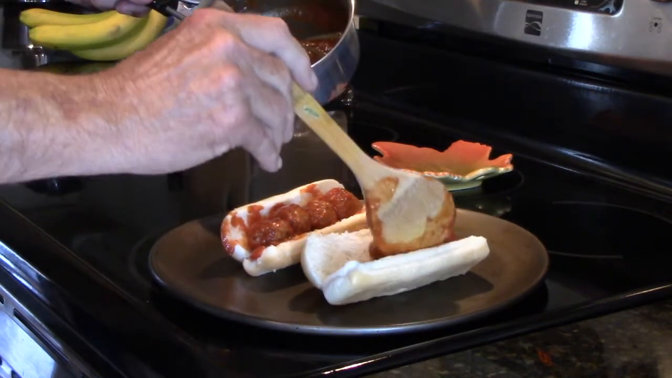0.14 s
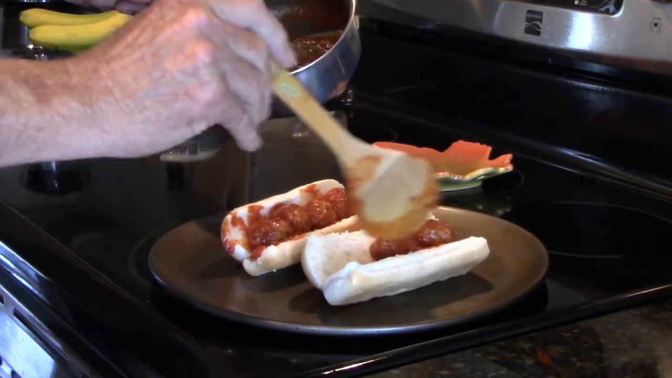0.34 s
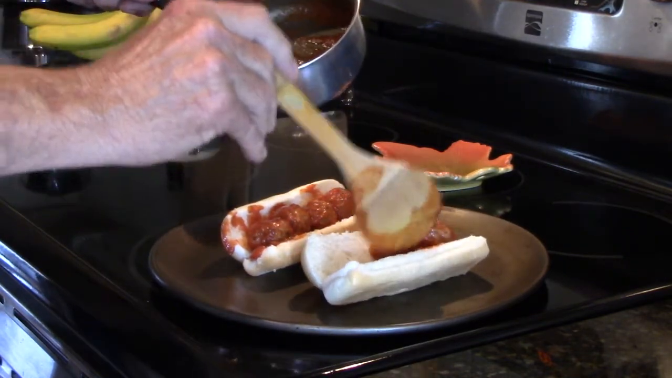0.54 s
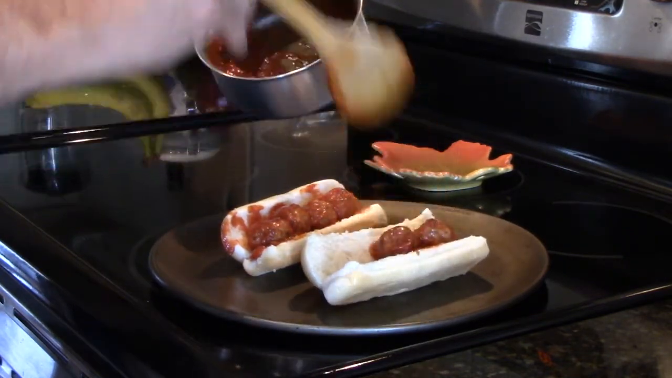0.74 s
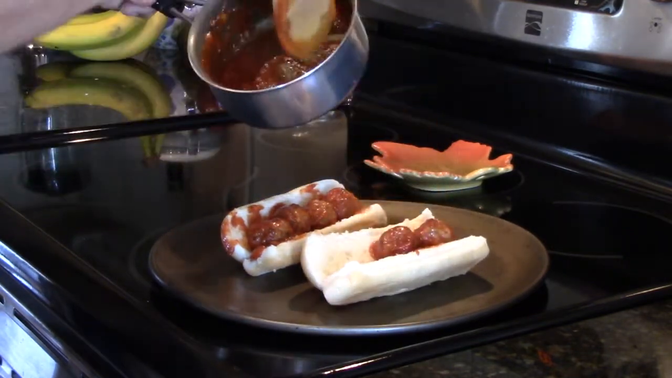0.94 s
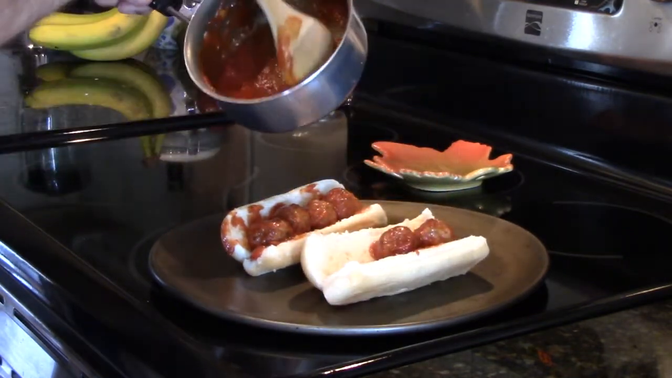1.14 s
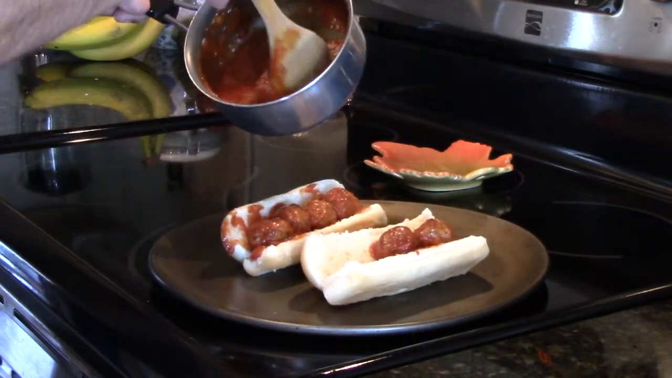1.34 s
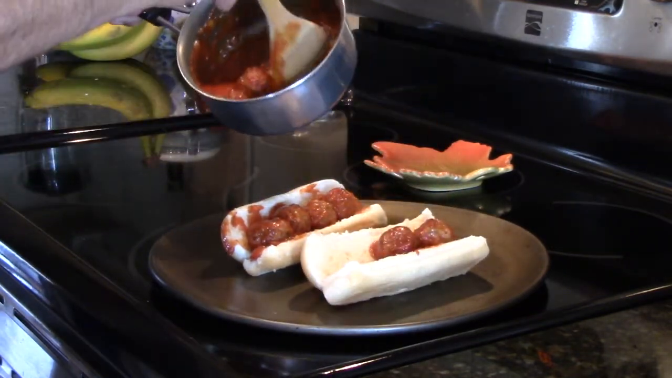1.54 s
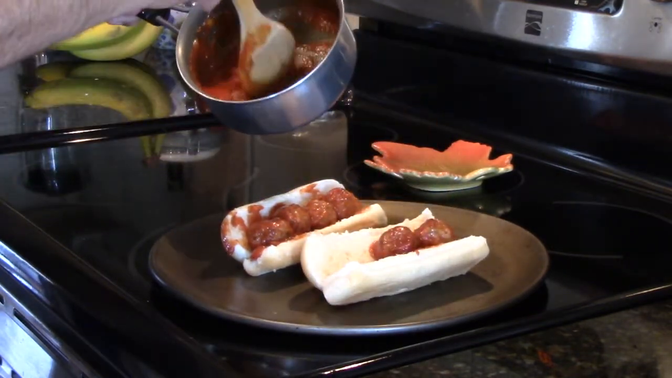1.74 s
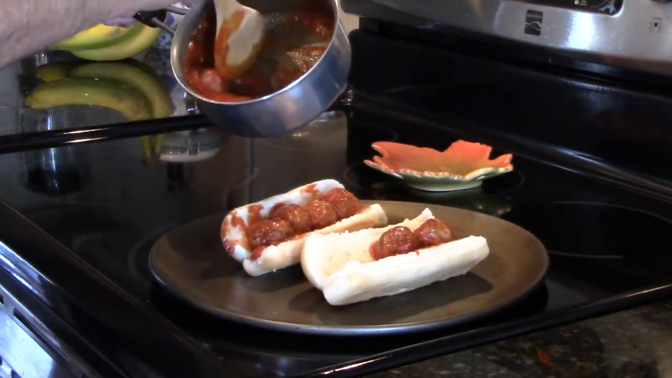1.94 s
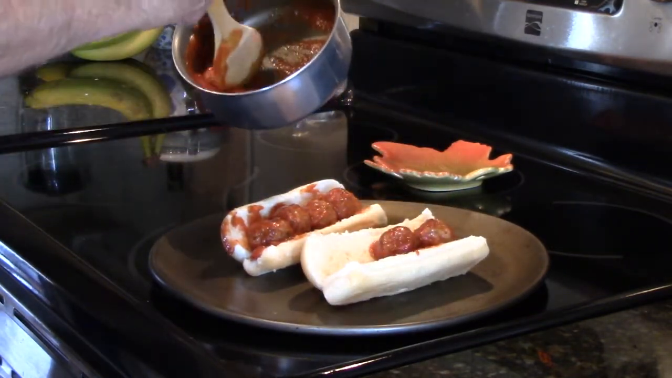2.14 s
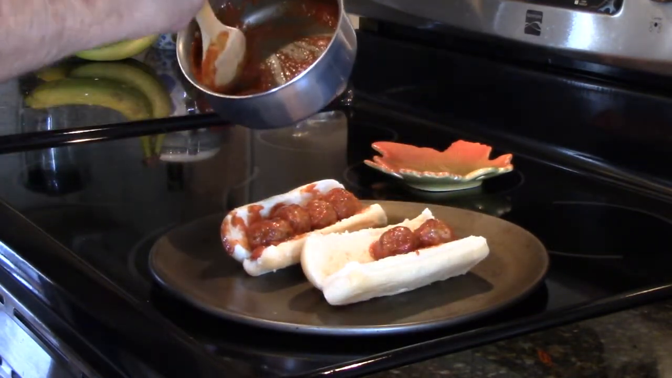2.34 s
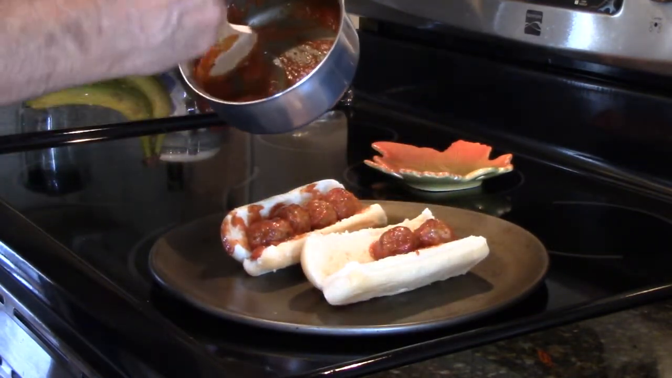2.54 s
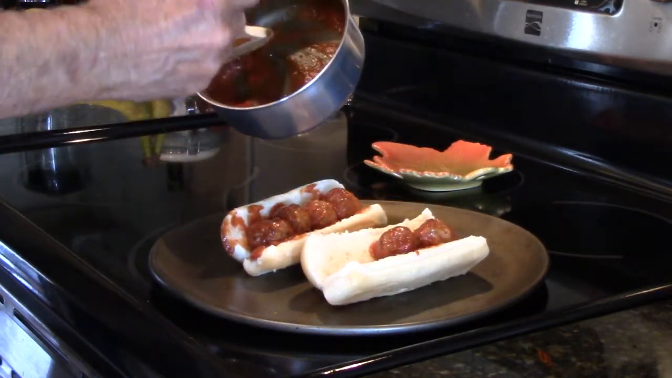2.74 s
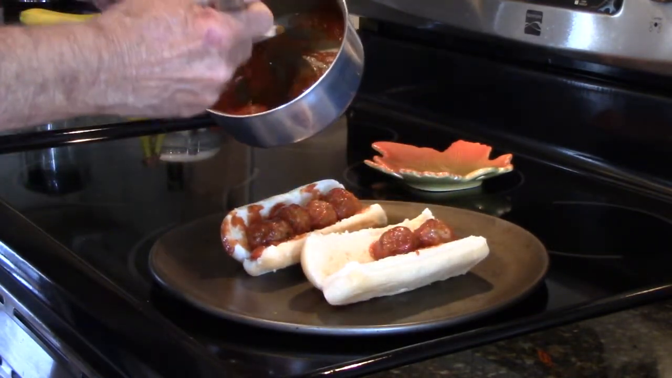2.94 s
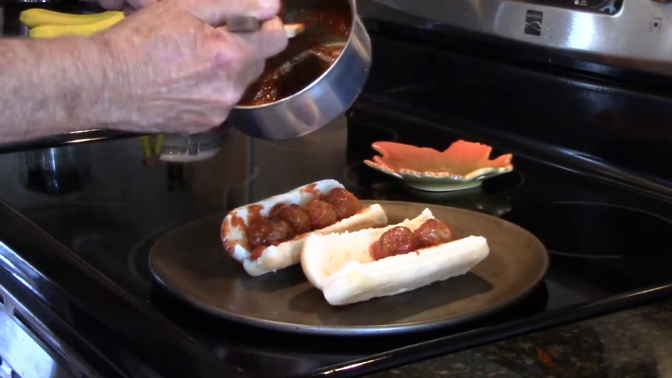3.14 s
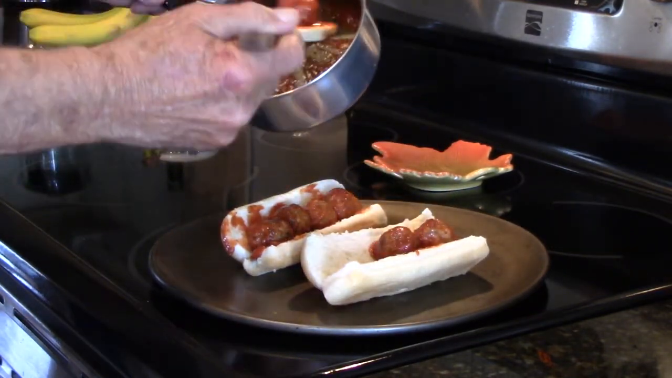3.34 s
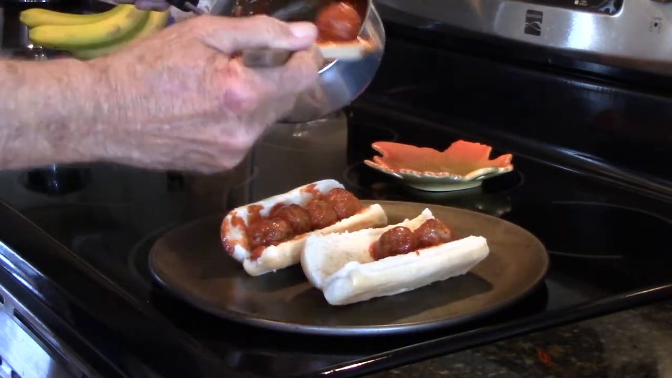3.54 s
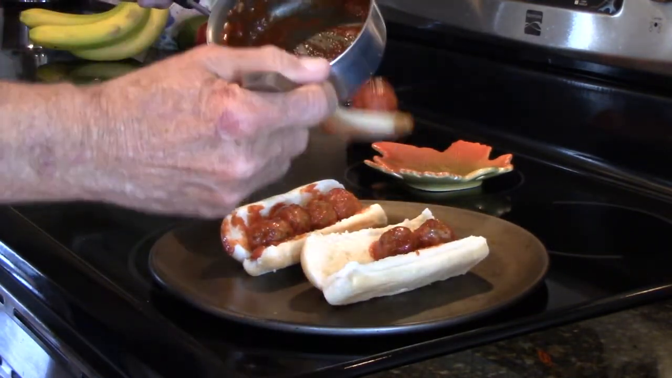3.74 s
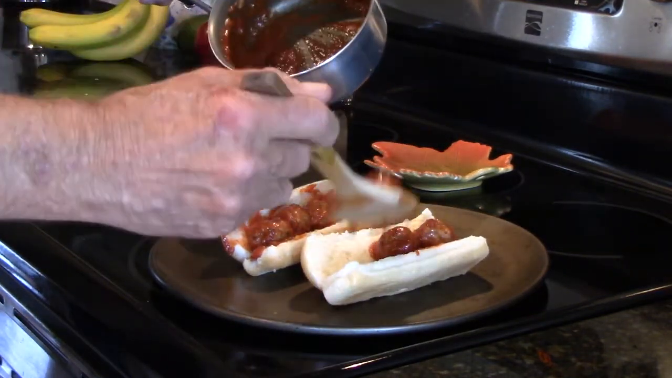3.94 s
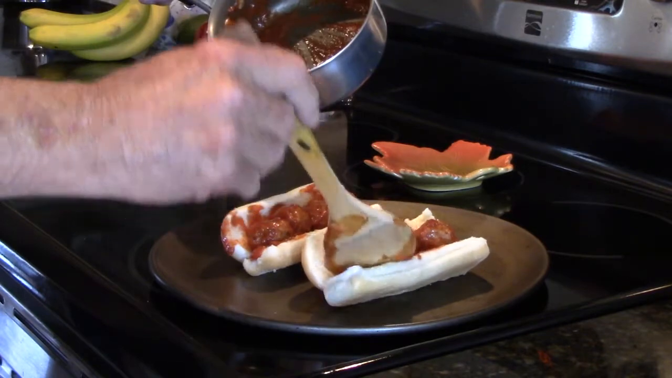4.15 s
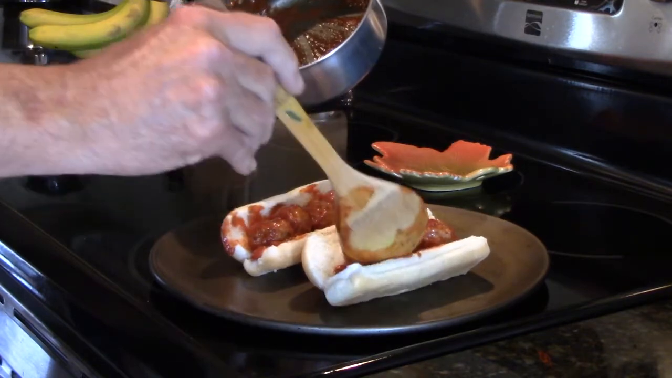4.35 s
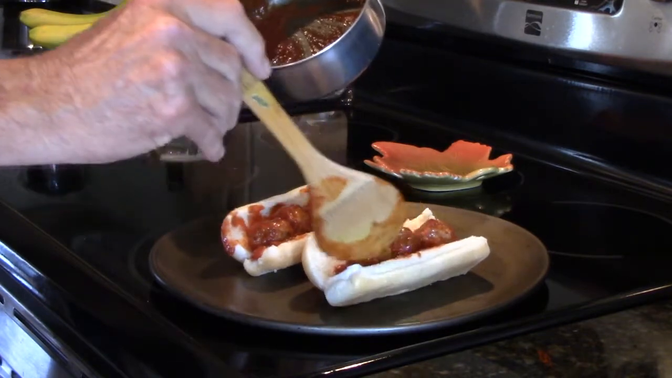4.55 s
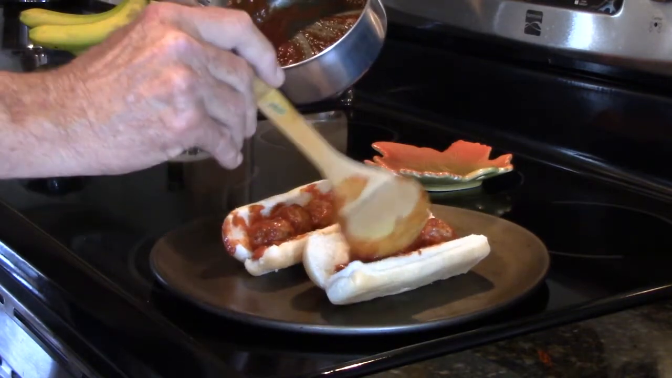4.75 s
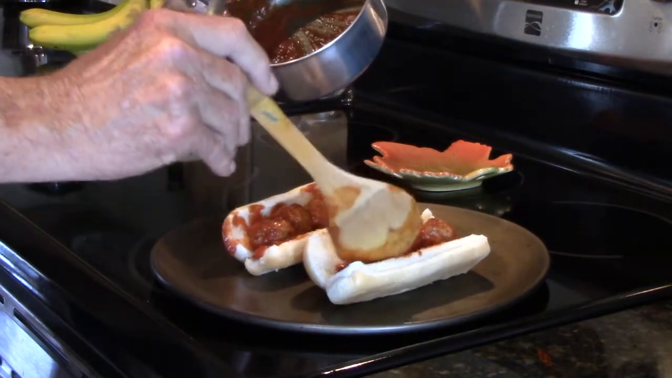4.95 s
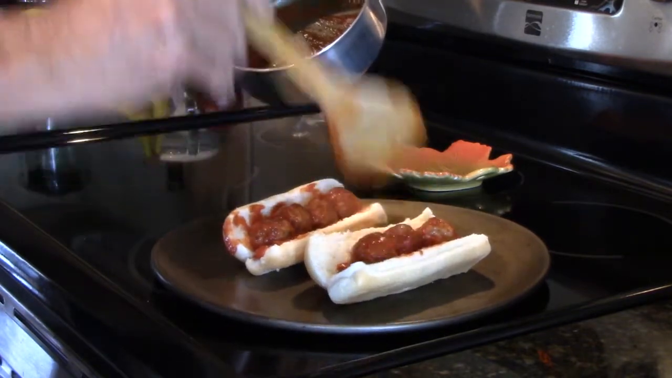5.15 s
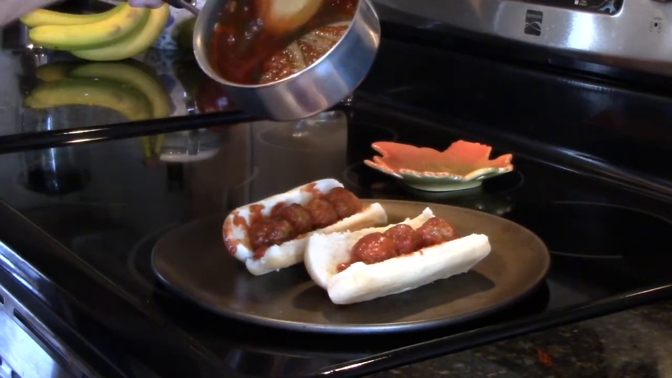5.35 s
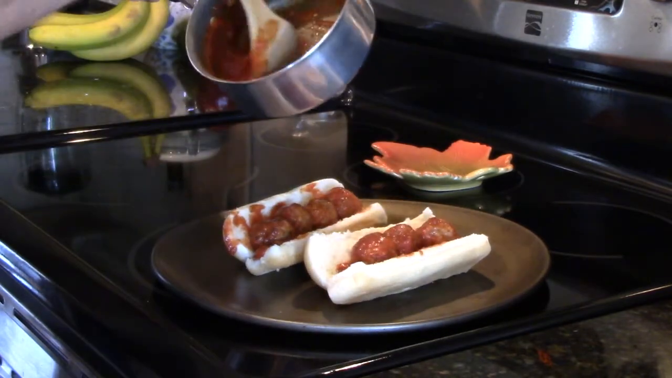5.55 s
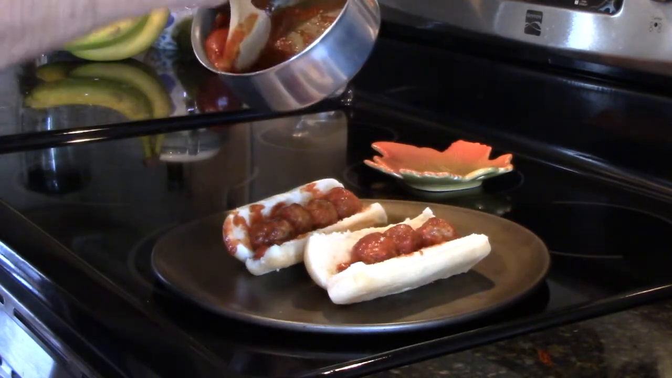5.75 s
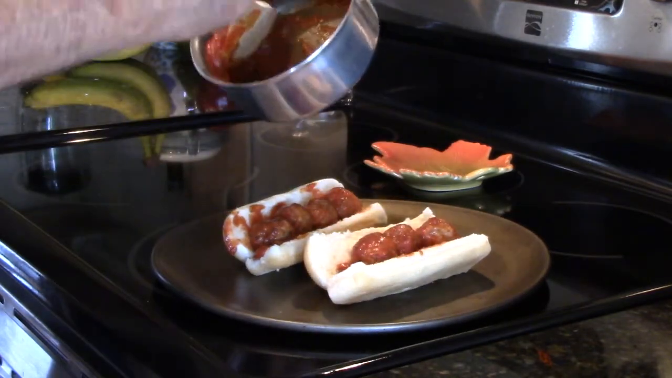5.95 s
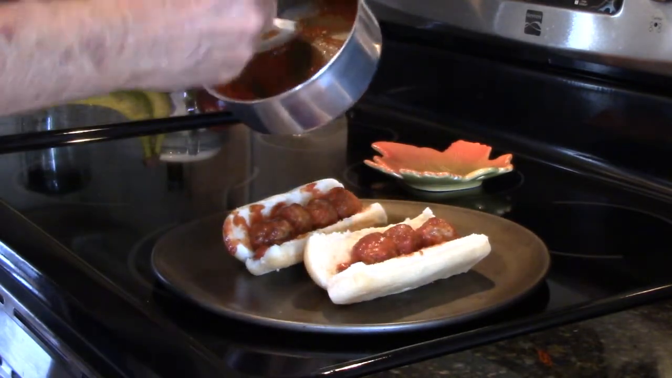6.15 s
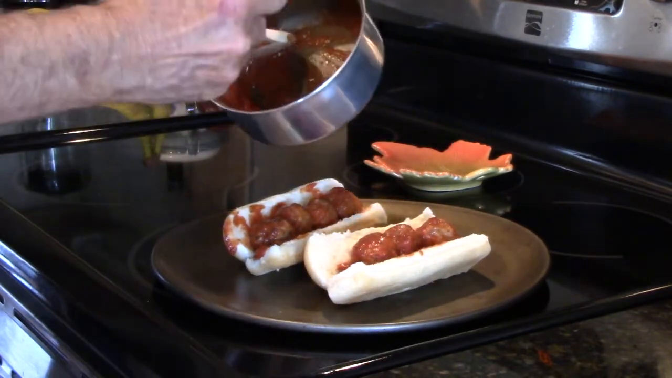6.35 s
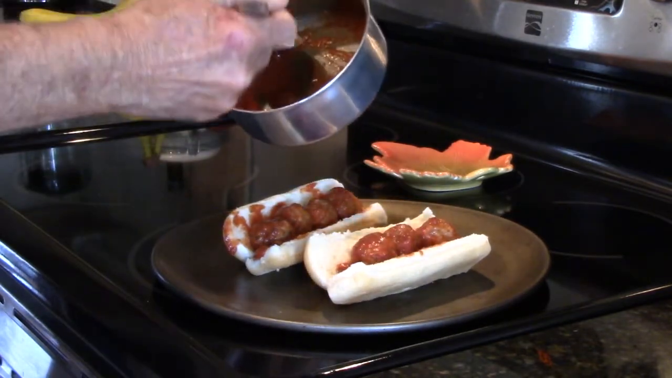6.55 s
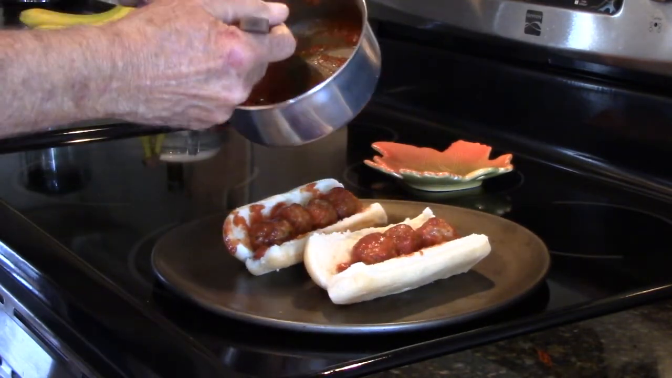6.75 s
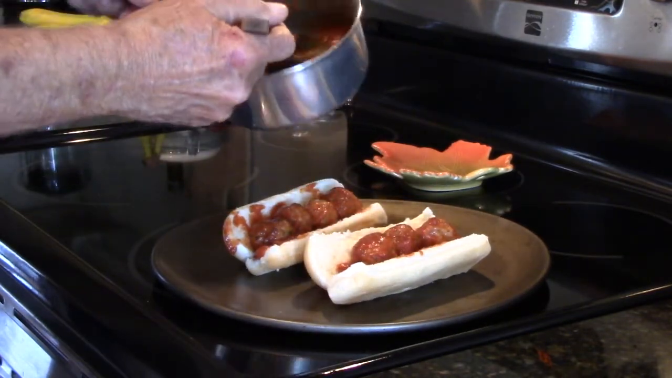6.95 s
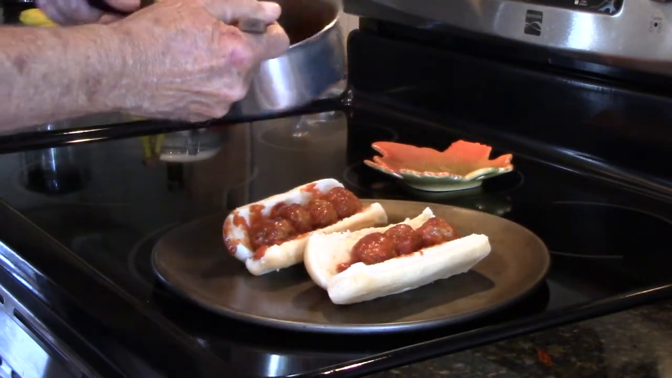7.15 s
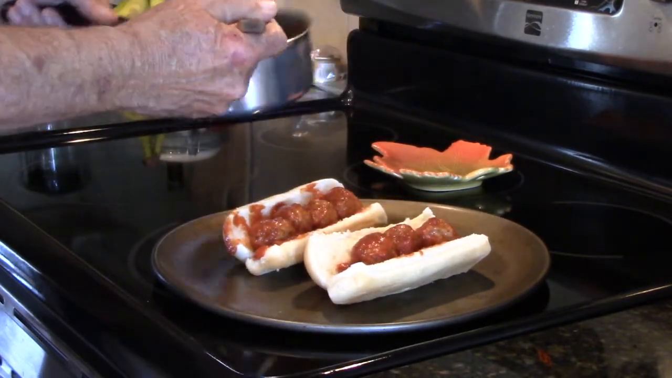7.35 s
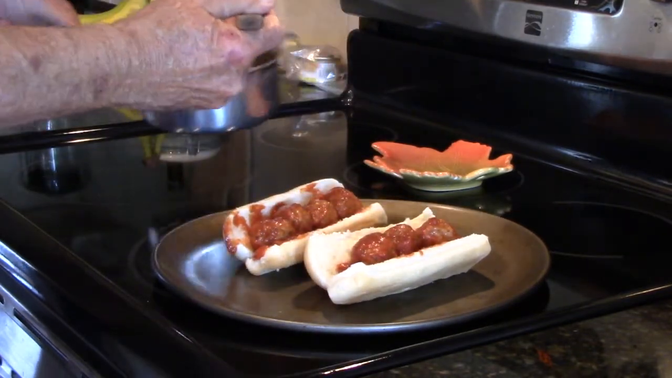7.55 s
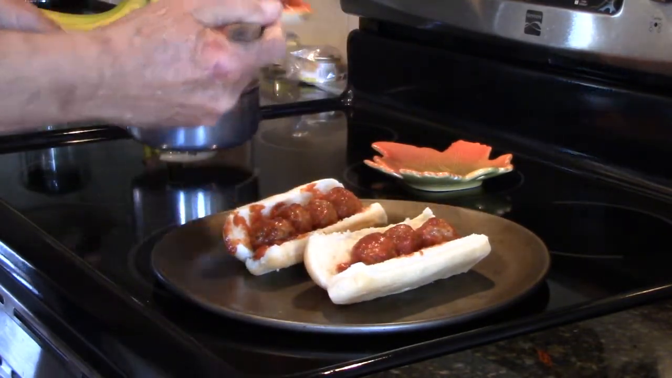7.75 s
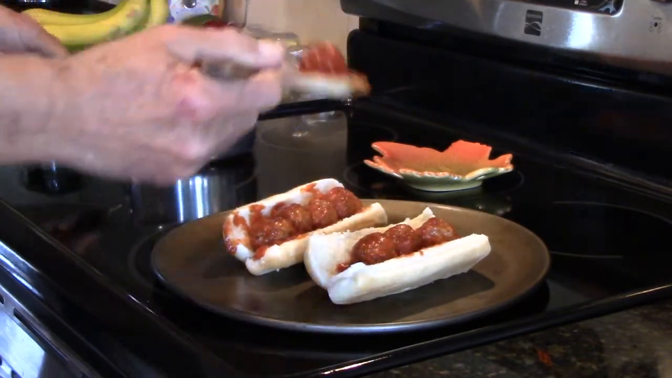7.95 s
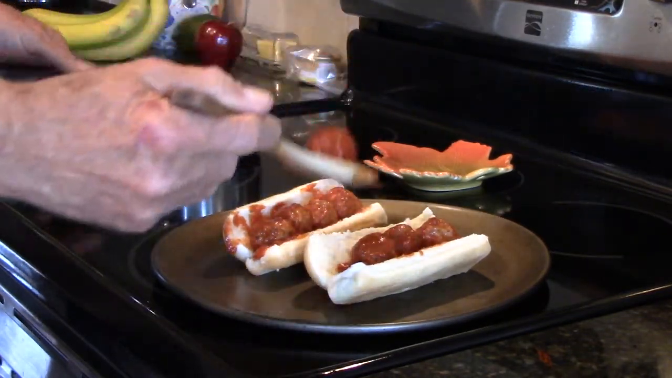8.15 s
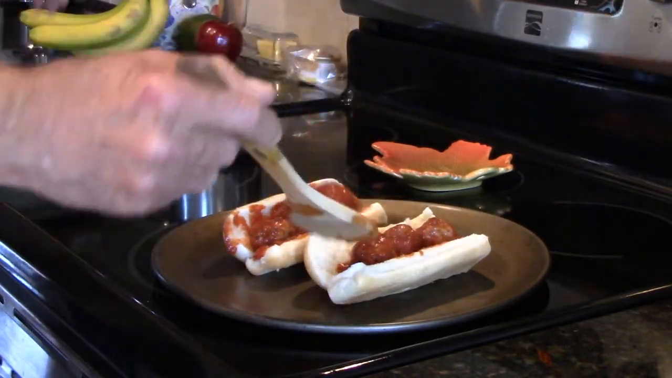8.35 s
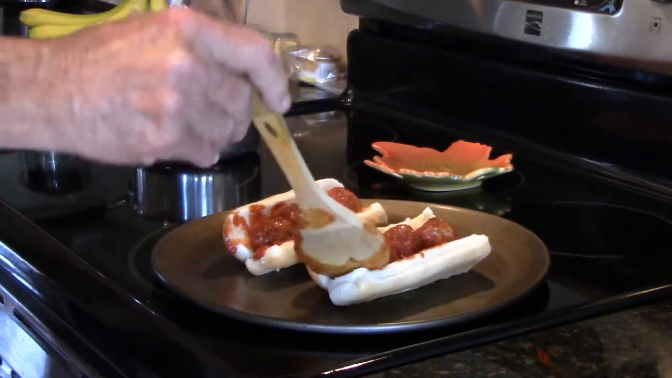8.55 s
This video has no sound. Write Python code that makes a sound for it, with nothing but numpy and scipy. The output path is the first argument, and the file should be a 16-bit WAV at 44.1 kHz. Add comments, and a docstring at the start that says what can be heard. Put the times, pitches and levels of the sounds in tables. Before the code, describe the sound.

Meatballs are spooned from a metal pan. Early on, two light wood-on-steel ticks lead into two heavy rounded knocks and a very soft one. Several seconds later a bright double clack and muffled thud follow, with tiny moist sauce sounds between. The pan is finally set down with a loud clang that shakes the stove. Low fan drone throughout, short kitchen echo, nearby microphone with a narrow image.

```python
"""Kitchen, fan humming: meatballs are spooned from a small steel saucepan into a roll.
A wooden spoon clacks on the pan's wall and thunks on its sauce-laden bottom; sauce smacks faintly.
Near the end the pan is set down hard on the glass hob. Both channels are nearly alike.
Solids are damped sines plus shaped noise bursts; sauce is noise; the fan is shaft and buzz tones
over rumble and hiss."""
import sys
import numpy as np
from scipy import signal
from scipy.fft import rfft, irfft, next_fast_len
from scipy.io import wavfile
from scipy.ndimage import map_coordinates

SR = 44100
rng = np.random.default_rng(int(sys.argv[2]) if len(sys.argv) > 2 else 0)


def bounce(signal):
    """Save signal as a 16-bit WAV file at the path given by the first command-line argument."""
    frames = np.transpose(np.atleast_2d(signal))
    limited = np.clip(frames, -1, 1)
    pcm = np.round(limited * 32767).astype(np.int16)
    wavfile.write(sys.argv[1], SR, pcm)


N = 379215


def amp(db):
    """Decibels to gain."""
    return 10 ** (np.asarray(db) / 20)


def unit(x):
    """Scale to rms 1."""
    return x / np.sqrt(np.mean(x ** 2) + 1e-20)


def along(points, hz):
    """Interpolate (f/Hz, value) points on a log frequency axis."""
    point_hz, values = np.transpose(points)
    return np.interp(np.log(hz + 1), np.log(point_hz + 1), values)


def wobble(knots_per_s):
    """Smooth random curve through normal-distributed knots."""
    knots = rng.standard_normal(int(N * knots_per_s / SR) + 4)
    return map_coordinates(knots, [np.arange(N) * knots_per_s / SR])


def filtered(x, response):
    """Multiply the spectrum of x by response(f/Hz)."""
    size = x.shape[-1]
    padded = next_fast_len(size + SR // 4)
    spectrum = rfft(x, padded) * response(np.fft.rfftfreq(padded, 1 / SR))
    return irfft(spectrum, padded)[..., :size]


def slope(x, edge_hz, kind):
    """Causal second-order low-pass or high-pass."""
    edge_hz = min(edge_hz, SR / 2 - 1)
    return signal.sosfilt(signal.butter(2, edge_hz, kind, fs=SR, output="sos"), x)


def noise(spectrum, size):
    """Coloured noise of rms 1."""
    return unit(filtered(rng.standard_normal(size), lambda hz: amp(along(spectrum, hz))))


def fade(t60_s):
    """One second of exponential decay."""
    return amp(-60 * np.arange(SR) / SR / t60_s)


def swell(rise_s):
    """One second of exponential attack settling at 1."""
    return 1 - np.exp(-np.arange(SR) / SR / rise_s)


def ring(modes):
    """One second of damped sines (f/Hz, level/dB, t60/s), each of random polarity."""
    t = np.arange(SR) / SR
    total = np.zeros(SR)
    for hz, db, t60_s in modes:
        polarity = rng.choice([-1, 1])
        total += polarity * amp(db) * fade(t60_s) * np.sin(2 * np.pi * hz * t)
    return total


def dying(x, decays):
    """Decay each frequency of x at its own t60."""
    hz, t, bins = signal.stft(x, SR, nperseg=256)
    bins = bins * amp(-60 * t / along(decays, hz)[:, None])
    return signal.istft(bins, SR, nperseg=256)[1][:len(x)]


def add(track, start_s, sound):
    """Mix a sound into the track in place."""
    part = track[round(start_s * SR):][:len(sound)]
    part += sound[:len(part)]


# Bare spoon on pan wall: [t/s, level/dB, bottom pitch f/Hz, bottom low mode over high/dB,
# crack over wall ring/dB, low-pass edge f/Hz]
WALL_BLOWS = [(0.999, -22.5, 703, 4.5, -4.5, 8950), (1.068, -20.5, 688, -9, -3.5, 5200),
              (5.4631, -12.5, 752, -13.5, 0, 11000), (5.502, -33, 755, -10, -14, 3000)]
SMACK_LEAD_S = 0.0012  # the sauce film closes just before the wood lands


def clacks():
    """Hard, bright blows on the wall; bottom and sauce answer."""
    out = np.zeros(N)
    for s, db, pitch_hz, low_db, crack_db, bright_hz in WALL_BLOWS:
        thud = amp(0.5) * bottom(pitch_hz, low_db, 0, 0.81) * swell(0.00062)
        sound = amp(db) * knock(thud, 0, crack_db, bright_hz)
        add(out, s, kitchen(sound, echo_db=-0.5, echo_hz=4000, wet_db=-6.5, wet_hz=3940))
        add(out, s - SMACK_LEAD_S, slope(smack(db - 18), bright_hz, "low"))
    return out


# Spoon on bottom through sauce: [t/s, level/dB, bottom pitch f/Hz, contact time/s]
BOTTOM_BLOWS = [(1.2159, -7, 656, 0.00038), (1.6483, -1, 678, 0.0013), (2.128, -27, 764, .0036),
                (5.5175, -8.5, 703, 0.0042)]
# Slapped sauce: [f/Hz, level/dB per Hz]
SLAP_SPECTRUM = [(150, -26), (310, 0), (450, 5), (600, -3), (850, -1), (1150, -2), (1400, -30), (2500, -35),
                 (5000, -60)]
HIGH_MODE_DB, HIGH_LOSS_DB_PER_S = 2.5, 16998
CRACK_DB, CRACK_LOSS_DB_PER_S = -15, 4000
SLAP_DB, SLAP_LOSS_DB_PER_S = -4.5, 12000
RING_SHARE, RING_SHARE_PER_S = 0.28, 330  # share of the free bottom's t60; slower push rings longer


def thunks():
    """Cushioned blows on the bottom: the longer the contact, the rounder and purer the note."""
    out = np.zeros(N)
    for s, db, pitch_hz, contact_s in BOTTOM_BLOWS:
        high_db = HIGH_MODE_DB - HIGH_LOSS_DB_PER_S * contact_s
        crack_db = CRACK_DB - CRACK_LOSS_DB_PER_S * contact_s
        slap_db = SLAP_DB - SLAP_LOSS_DB_PER_S * contact_s
        note = bottom(pitch_hz, 0, high_db, RING_SHARE + RING_SHARE_PER_S * contact_s)
        slap = amp(slap_db) * noise(SLAP_SPECTRUM, SR) * fade(0.018)
        thud = (note + slap) * swell(contact_s)
        sound = amp(db) * knock(thud, wall_db=-26, crack_db=crack_db, bright_hz=1700)
        add(out, s, kitchen(sound, echo_db=3, echo_hz=4000, wet_db=-4.5, wet_hz=3940))
        add(out, s - SMACK_LEAD_S, smack(db - 42))
    return out


# Low and high mode of the free bottom: [multiple of pitch, t60/s]
BOTTOM_MODES = [(1, 0.027), (1.5, 0.045)]


def bottom(pitch_hz, low_db, high_db, ring_share):
    """The bottom's two modes; the sauce lying on it sets their pitch and damping."""
    modes = []
    for (multiple, t60_s), db in zip(BOTTOM_MODES, (low_db, high_db)):
        modes.append((pitch_hz * multiple, db, t60_s * ring_share))
    return ring(modes)


# Pan wall, damped by hand and sauce: [f/Hz, level/dB, t60/s]
WALL_MODES = [(1220, -17, 0.028), (1573, -8, 0.06), (1654, -5.5, 0.059), (1830, -30, 0.025),
              (1988, -19, 0.2), (2510, -23, 0.034), (2497, -26, 0.09), (3070, -9.5, 0.023),
              (3355, -18, 0.052), (3860, -8, 0.025), (4355, -19, 0.037), (6060, -40, .05),
              (7390, -27, 0.072), (7770, -45, 0.04), (8200, -39, .04)]
# Wood on steel: [f/Hz, level/dB per Hz]
CRACK_SPECTRUM = [(150, -38), (400, -4), (1200, 6), (2200, 1.5), (3200, -3.5), (4400, -5), (5400, -6.5),
                  (7000, -7.5), (8500, -6.5), (10000, -16), (12000, -20), (15500, -27)]


def knock(thud, wall_db, crack_db, bright_hz):
    """Bottom thud, wall ring and crack of wood; sauce on the spoon dulls the contact."""
    wall = amp(wall_db) * ring(WALL_MODES) * swell(0.00063)
    crack = amp(crack_db) * noise(CRACK_SPECTRUM, SR) * fade(0.028) * swell(0.00056)
    sound = slope(thud + wall + crack, bright_hz, "low")
    return slope(sound, edge_hz=290, kind="high")  # a small pan radiates little bass


# Contacts as the pan rocks flat on the hob: [t/s, level/dB]
LANDING_HITS = [(7.828, -4), (7.839, -19), (7.8530, -15.5), (7.866, -16)]
# Steel on glass: [f/Hz, level/dB per Hz]
CLASH_SPECTRUM = [(59, -51), (100, -35), (378, -30), (640, -11.5), (1230, -3), (1590, -13), (3120, -9.5),
                  (3770, -17), (4460, -16.5), (6660, -33.5), (7890, -23), (9340, -36.5), (11800, -31.5),
                  (15500, -54)]
# Pan and hob ringing together: [f/Hz, level/dB, t60/s]
HOB_MODES = [(156.6, -8.5, 0.35), (228, -9, 0.15), (306.6, -1.5, 0.24), (378, -8.5, 0.4), (451, -8, 0.58),
             (490, -22, 0.91), (632, 4.5, 0.34), (729, -2, 0.36), (774, -4.5, 0.32), (935, -3.5, 0.29),
             (1046, -7, 0.5), (1117, -6, 0.24), (1175, 5, 0.093), (1283, -9, 0.42), (1374, -14, 0.69),
             (1590, -20, .23), (1733, -6.5, 0.56), (1790, -10.5, .56), (2207, -6, 0.38), (2603, -7, 0.31),
             (2720, -16, .16), (2905, -5, 0.18), (3020, 9, 0.035), (3110, -6, 0.35), (3530, -19, 0.36),
             (4000, -24, 0.35), (4860, -18, 0.17), (6260, -23, 0.19), (7050, -25, 0.34), (7600, -30, .27)]
# Stove's crowded sheet-metal modes: [f/Hz, level/dB per Hz]
STOVE_SPECTRUM = [(25, -50), (50, -38), (90, -29), (130, -6.5), (170, -4.5), (280, -3.5), (450, -6.5),
                  (650, 1.5), (850, 2), (1400, -9), (1800, 2.5), (2200, -9), (3200, -12.5), (5500, -28),
                  (8000, -30.5), (15500, -45)]
# Their decay: [f/Hz, t60/s]
STOVE_T60 = [(120, 0.17), (300, 0.87), (1000, 0.41), (2000, 0.47), (4000, 0.47), (8000, 0.46),
             (14000, 0.27)]


def set_down():
    """The pan lands, rocks flat in a few quick contacts and shakes the whole stove."""
    out = np.zeros(N)
    for s, db in LANDING_HITS:
        clash = amp(db) * noise(CLASH_SPECTRUM, SR) * fade(0.051) * swell(0.0015)
        add(out, s, kitchen(clash, echo_db=-29, echo_hz=5000, wet_db=-7, wet_hz=9000))
    modes = amp(-16.5) * ring(HOB_MODES) * swell(0.002)
    panels = amp(-12.5) * dying(noise(STOVE_SPECTRUM, SR), STOVE_T60) * swell(0.013)
    body = slope(modes, edge_hz=108, kind="high") + slope(panels, edge_hz=190, kind="high")
    add(out, LANDING_HITS[0][0], body)
    return out


# Spoon pushing through sauce: [t/s, length/s, level/dB]
SAUCE_PUSHES = [(1.65, 0.18, -64.5), (5.537, .14, -62)]
# Wet food meeting or leaving the spoon: [t/s, level/dB]
SAUCE_SMACKS = [(.47, -54), (4.859, -48), (5.461, -28), (5.672, -53), (6.539, -43), (8.238, -46.5)]
STIR_ATTACK_S, STIR_RELEASE_S = 0.045, 0.035


def sauce():
    """Wet films meet or burst: single smacks, and a fine crackle when the spoon digs in."""
    t = np.arange(N) / SR
    push = np.zeros(N)
    for s, length_s, db in SAUCE_PUSHES:
        attack = np.clip((t - s) / STIR_ATTACK_S, 0, 1)
        release = np.exp(-np.maximum(t - s - length_s, 0) / STIR_RELEASE_S)
        push += amp(db) * attack * release
    crackle = unit(noise(SAUCE_SPECTRUM, N) * amp(1.7 * wobble(250)))
    out = push * crackle
    for s, db in SAUCE_SMACKS:
        add(out, s, kitchen(smack(db), echo_db=-8, echo_hz=6000, wet_db=-5, wet_hz=8000))
    return out


# Wet sauce: [f/Hz, level/dB per Hz]
SAUCE_SPECTRUM = [(1500, -13), (4000, 6.5), (6500, -1), (8800, 4), (12500, -8), (15500, -18)]


def smack(db):
    """A film of sauce closes or bursts: a short noise burst."""
    return amp(db) * noise(SAUCE_SPECTRUM, SR) * fade(0.016) * swell(0.00076)


# Fan speed: [t/s, turns per s]
SHAFT_SPEED = [(0, 36.2), (1.8, 36.25), (3, 36.58), (8.6, 36.6)]
# Strongest tones, shifting across room resonances with speed:
# [shaft order, level at low speed/dB, level at full speed/dB]
DRONE = [(16, -59, -51.5), (17, -56.5, -53), (18, -48, -53)]
# Weaker tones, some of them sidebands of the magnetic buzz: [shaft order, buzz multiple, level/dB]
WEAK_TONES = [(0, 1, -55), (4, 0, -57.5), (3, 1, -62), (0, 3, -68.5), (18, -1, -64), (19, 0, -60.5),
              (17, 1, -56.5), (18, 1, -64), (19, 1, -63), (29, 0, -68.5), (33, 0, -65)]
# Duct rumble: [f/Hz, level/dB per Hz]
DUCT_SPECTRUM = [(25, -34), (45, -25), (70, -16.5), (90, -8.5), (110, -8.5), (150, -0.5), (185, -1),
                 (220, -4.5), (300, -2.5), (430, -8), (600, -3), (800, -5.5), (1000, -16.5), (1400, -44)]
# Air hiss: [f/Hz, level/dB per Hz]
AIR_SPECTRUM = [(530, -28), (900, -4), (1130, -4.5), (1170, -1), (1270, -5), (1370, -2), (1590, -4),
                (1820, -3.5), (2760, -11.5), (4440, -16), (5500, -16), (13000, -34), (15500, -48)]
BUZZ_HZ = 120


def tone(cycles, db):
    """Sine of given rms level and random phase."""
    return np.sqrt(2) * amp(db) * np.sin(2 * np.pi * (cycles + rng.random()))


def fan():
    """Motor tones tied to the shaft and the mains, over duct rumble and air hiss."""
    t = np.arange(N) / SR
    speed = np.interp(t, *np.transpose(SHAFT_SPEED))
    pace = (speed - speed.min()) / np.ptp(speed)  # 0 at low speed, 1 at full speed
    turns = np.cumsum(speed + 0.0301 * wobble(3.1)) / SR
    drone = np.zeros(N)
    for order, slow_db, full_db in DRONE:
        drift = 0.13 * wobble(1.5)  # cycles; room paths shift, so the tones beat unevenly
        level_db = slow_db + pace * (full_db - slow_db) + 2.2 * wobble(1.51)
        drone += tone(order * turns + drift, level_db)
    weak = np.zeros(N)
    for order, multiple, db in WEAK_TONES:
        cycles = order * turns + multiple * BUZZ_HZ * t
        weak += tone(cycles, db + 1.04 * wobble(5.7))
    rush = amp(-51) * noise(DUCT_SPECTRUM, N) + amp(-55) * noise(AIR_SPECTRUM, N)
    rush = kitchen(rush, echo_db=-20, echo_hz=3000, wet_db=-9, wet_hz=6000)
    return drone + weak + amp(-58.5) * whir(turns) + rush


# Faint high shaft orders: [f/Hz, level/dB]
WHIR_SPECTRUM = [(75, -40), (190, -6), (350, 1), (500, 4), (900, 2.5), (1300, -2), (1850, 3), (2400, -2.5),
                 (3300, -14.5), (4000, -60)]


def whir(turns, size=4096):
    """Uneven blades repeat one rough pattern every turn: a faint comb of shaft orders."""
    orders = rfft(rng.standard_normal(size))
    hz = SHAFT_SPEED[-1][1] * np.arange(len(orders))
    pattern = unit(irfft(orders * amp(along(WHIR_SPECTRUM, hz))))
    return np.interp(turns % 1, np.arange(size) / size, pattern)


# Reflections off hob, panel and walls: [delay t/s, gain]
NEAR_ECHOES = [(.0036, 0.082), (.0073, 0.4), (.0105, 0.2), (.029, .14), (.041, 0.057)]
# Room tail: [f/Hz, t60/s]
ROOM_T60 = [(150, 0.35), (700, 0.58), (2000, 0.48), (5000, 0.4), (14000, 0.21)]


def kitchen(x, echo_db, echo_hz, wet_db, wet_hz):
    """Direct sound, duller echoes off near surfaces, and the room's diffuse tail."""
    early = np.zeros(SR)
    for s, gain in NEAR_ECHOES:
        add(early, s, np.array([gain]))
    tail = dying(rng.standard_normal(SR), ROOM_T60) * swell(0.0077)
    tail /= np.linalg.norm(tail)
    answer = filtered(early, lambda hz: amp(echo_db) / (1 + 1j * hz / echo_hz))
    answer += filtered(tail, lambda hz: amp(wet_db) / (1 + 1j * hz / wet_hz))
    return x + signal.fftconvolve(x, answer)[:len(x)]


# Room noise unlike at the two microphones: [f/Hz, level/dB per Hz]
APART_SPECTRUM = [(25, -7), (60, -14), (130, -6), (300, 7), (1000, -7.5), (2000, -19), (4000, -29.5),
                  (15000, -56)]


def scene():
    """Everything reaches both close-set microphones nearly alike."""
    mid = clacks() + thunks() + set_down() + sauce() + fan()
    late = np.roll(mid, SR // 1000)  # about 1 ms
    glancing = slope(late, edge_hz=2400, kind="low")  # sound arriving from the sides
    side = amp(-31.5) * glancing + amp(-67) * noise(APART_SPECTRUM, N)
    balance_db = [[0.05], [-0.05]]
    return np.array([mid + side, mid - side]) * amp(balance_db)


def record(dry):
    """Round off the highest peaks, then cut everything above the band limit."""
    rounded = dry / (1 + np.abs(dry / 0.95) ** 6) ** (1 / 6)
    return filtered(rounded, lambda hz: hz < 15700)


dry = scene()
out = record(dry)
bounce(out)
```